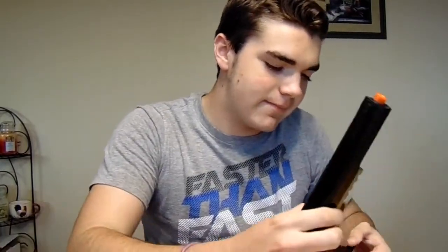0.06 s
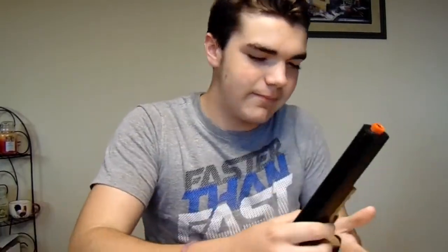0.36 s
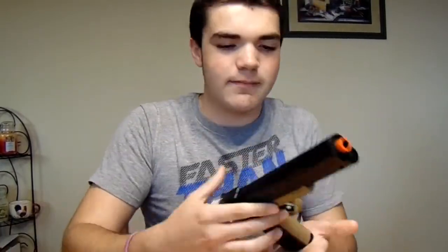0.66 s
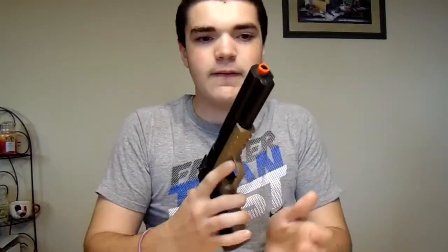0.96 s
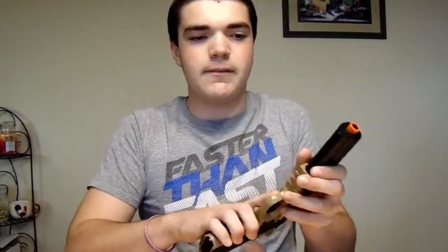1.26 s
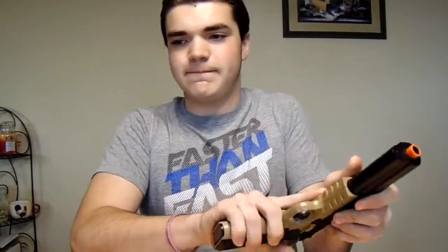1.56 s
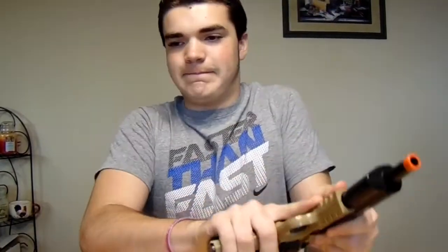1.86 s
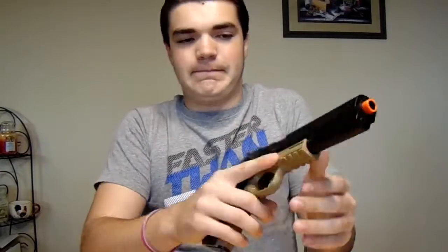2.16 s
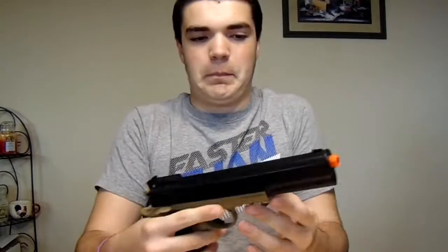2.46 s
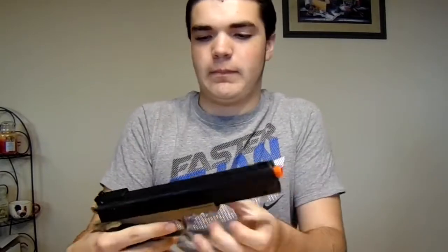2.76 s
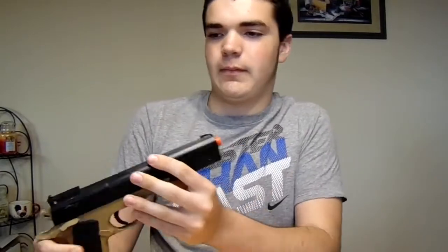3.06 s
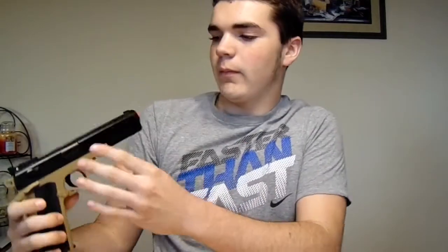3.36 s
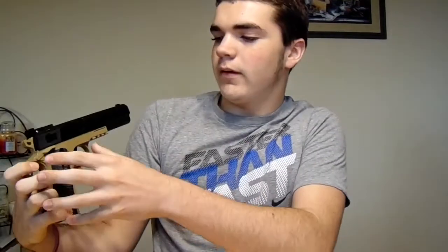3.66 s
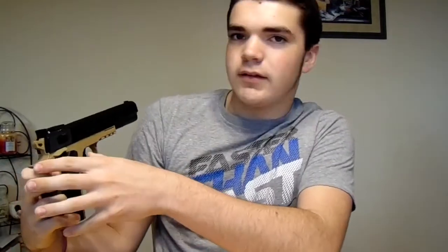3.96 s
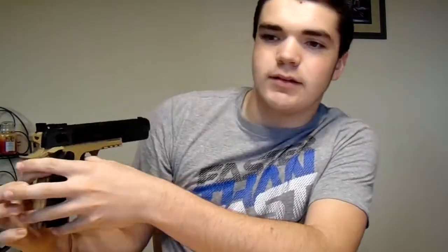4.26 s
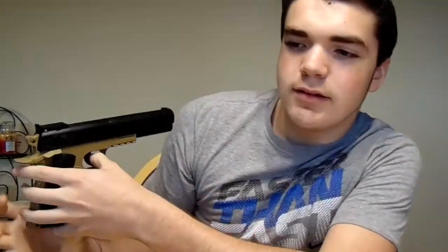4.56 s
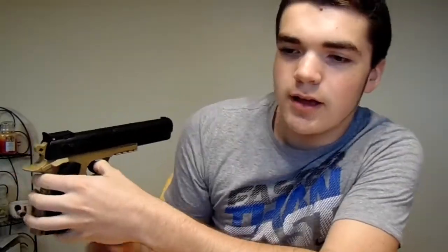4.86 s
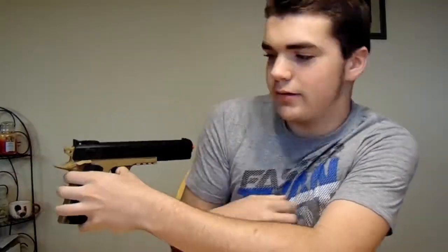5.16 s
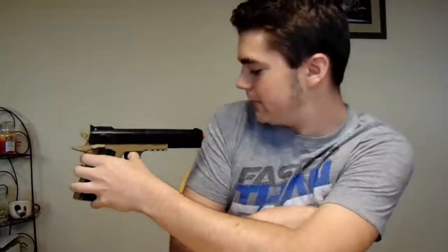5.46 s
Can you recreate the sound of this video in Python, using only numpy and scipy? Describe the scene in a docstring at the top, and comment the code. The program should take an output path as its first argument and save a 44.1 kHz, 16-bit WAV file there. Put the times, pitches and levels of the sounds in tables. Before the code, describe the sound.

A plastic toy pistol is handled close to a desk microphone in a bare room, over faint mains hum, fan noise and hiss. Fingers rub and a small squeak sounds at the start. At about 0.25 seconds the magazine scrapes into the grip, latching with a sharp click at 0.35. Loose parts tick irregularly amid faint, low seat creaks. Around 1.7 seconds the slide grinds back and hits its stop with a loud clack at 1.8, then scrapes forward and snaps home just after 2 seconds, leaving a faint spring ring. Sparser, softer ticks and tiny squeaks follow, the clearest tick near 3 seconds. A sleeve brushes softly at 4.3 seconds. At about 4.65 an elbow lands on the table with a dull thump and slight rattle, and the chair rumbles low under the leaning sitter, easing off by 5.5 seconds.

```python
"""A bare room, with a small desk microphone close to a plastic spring pistol being handled.
Loose parts tick amid small squeaks and low seat creaks; the magazine scrapes in and latches, the slide is
racked back and its scraping spring snaps it home. Each clack is a crack of noise, then the part's ringing.
Then a sleeve brushes, an elbow thumps on the table and the chair rumbles as its sitter leans over.
Mains hum, a faint fan and microphone hiss lie beneath."""
import sys
import numpy as np
from scipy import signal
from scipy.fft import rfft, irfft, next_fast_len
from scipy.io import wavfile
from scipy.ndimage import uniform_filter1d

SR = 44100
rng = np.random.default_rng(int(sys.argv[2]) if len(sys.argv) > 2 else 0)


def write(x):
    x = np.atleast_2d(x).T
    wavfile.write(sys.argv[1], SR, np.round(np.clip(x, -1, 1) * 32767).astype(np.int16))


N = 242638


def amp(db):
    """Decibels to gain."""
    return 10 ** (np.asarray(db) / 20)


def unit(x):
    """Scale to rms 1."""
    return x / np.sqrt(np.mean(x ** 2) + 1e-20)


def crest(x):
    """Scale so that the loudest 4 ms have rms 1."""
    return x / np.sqrt(uniform_filter1d(x ** 2, 176).max() + 1e-20)


def along(points, hz):
    """Read (frequency, value) points on a log frequency axis."""
    freqs, values = np.transpose(points)
    return np.interp(np.log(hz + 1), np.log(freqs + 1), values)


def filtered(x, response):
    """Multiply the spectrum of x by a function of frequency."""
    size = next_fast_len(len(x) + 8192)
    return irfft(rfft(x, size) * response(np.fft.rfftfreq(size, 1 / SR)), size)[:len(x)]


def coloured(x, colour, size=4096):
    """Minimum-phase filter through (frequency, level) points."""
    gain = amp(along(colour, np.fft.rfftfreq(size, 1 / SR)))
    cepstrum = irfft(np.log(gain + 1e-6))
    cepstrum[1:size // 2] *= 2
    cepstrum[size // 2 + 1:] = 0
    return signal.fftconvolve(x, irfft(np.exp(rfft(cepstrum))))[:len(x)]


def band(x, edge_hz, kind):
    """Causal low-, band- or high-pass."""
    return signal.sosfilt(signal.butter(3, edge_hz, kind, fs=SR, output="sos"), x)


def add(track, s, x):
    """Mix x into the track at time s."""
    start = int(np.clip(round(s * SR), 0, N - 1))
    track[start:start + len(x)] += x[:N - start]


def swells(rows, attack_s, release_db_per_s):
    """Gain of movements (time, hold, level) that each build up, hold and die away."""
    t = np.arange(N) / SR
    gain = np.zeros(N)
    for s, hold, db in rows:
        rise = np.clip((t - s) / attack_s, 0, 1)
        released_s = np.maximum(t - s - attack_s - hold, 0)
        gain += rise * amp(db - release_db_per_s * released_s)
    return gain


def friction(colour, slips_per_s, spread_db, hiss):
    """Tiny slips of uneven size over a smooth hiss."""
    slips = (rng.random(N) < slips_per_s / SR) * rng.choice([-1, 1], N)
    sizes = amp(spread_db * np.clip(rng.standard_normal(N), -2, 2))
    return unit(coloured(unit(slips * sizes) + hiss * rng.standard_normal(N), colour))


def stroke(rub, rows, split_hz, **envelope):
    """Pressure sets the body of a rubbing sound and speed its hiss."""
    body = swells([(s, hold, db) for s, hold, db, _ in rows], **envelope)
    hiss = swells([(s, hold, db) for s, hold, _, db in rows], **envelope)
    return body * unit(band(rub, split_hz, "low")) + hiss * unit(band(rub, split_hz, "high"))


def burst(t, t60, attack_s):
    """The dense, dying chatter of one contact."""
    return rng.standard_normal(len(t)) * amp(-60 * t / t60) * (1 - np.exp(-t / attack_s))


def ringing(t, modes, scatter_db=2):
    """Damped modes; each blow lands elsewhere and weights them anew."""
    ring = np.zeros(len(t))
    for hz, width, db in modes:
        weight = amp(db + scatter_db * rng.standard_normal()) * np.sqrt(width)
        ring += weight * np.exp(-np.pi * width * t) * np.sin(2 * np.pi * (hz * t + rng.random()))
    return crest(ring * (1 - np.exp(-t / 0.001)))


def contact(colour, modes, knock_db, snap_db, ring_db, t60, attack_s):
    """Plastic cracks and its modes ring on; a blunt blow knocks low, an edge snaps high."""
    t = np.arange(SR // 7) / SR
    first_touch = 1 + 0.96 * np.exp(-t / 0.0012)
    crack = crest(coloured(burst(t, t60, attack_s) * first_touch, colour))
    clack = crack + amp(ring_db) * ringing(t, modes)
    knock = amp(knock_db) * crest(band(clack, 1200, "low"))
    snap = amp(snap_db) * crest(band(clack, 5000, "high"))
    return knock + crest(band(clack, [1200, 5000], "band")) + snap


def strikes(hits, colour, modes, ring_db, lead_s):
    """A run of hard contacts on one part, each starting lead_s ahead of its time."""
    track = np.zeros(N)
    for s, db, knock_db, snap_db, t60 in hits:
        clack = contact(colour, modes, knock_db, snap_db, ring_db, t60, attack_s=0.0003)
        add(track, s - lead_s, amp(db) * clack)
    return track


# Mains hum: (frequency [Hz], relative level [dB])
HUM_PARTIALS = [(59.2, -62.5), (118.4, -67.5), (296.1, -70), (651.4, -77), (818.3, -74.5)]
# Fan and microphone hiss: (frequency [Hz], relative level [dB])
AIR_COLOUR = [(12, -33), (20, 4.5), (60, -4.5), (249, -4), (302, -4), (376, -8), (650, -14.5), (706, -25.5),
              (766, -7), (1010, -15.5), (1120, -12), (1220, -19), (14000, -29.5)]
def room_tone():
    """Mains hum, a faint fan and the microphone's own hiss."""
    t = np.arange(N) / SR
    hum = sum(amp(db) * np.sqrt(2) * np.sin(2 * np.pi * (hz * t + rng.random()))
              for hz, db in HUM_PARTIALS)
    air = unit(coloured(rng.standard_normal(N), AIR_COLOUR))
    return amp(-3.5) * hum + amp(-61) * air


# Finger strokes: (time [s], hold [s], body level [dB], hiss level [dB])
FINGER_STROKES = [(-.03, .05, -40.5, -46), (.6, .42, -53.5, -57.5), (1.33, 0.048, -49, -57),
                  (1.56, .06, -62, -60.5), (3.12, 1.6, -59.5, -60.5)]
# Skin on plastic: (frequency [Hz], relative level [dB])
SKIN_COLOUR = [(240, -41.5), (400, -6.5), (663, -17.5), (725, -5), (1120, -3.5), (1530, -9), (1800, -9.5),
               (2020, -11.5), (14000, -25.5)]
FINGER_ENVELOPE = dict(attack_s=0.03, release_db_per_s=40)
def fingers():
    """Fingers rub over the pistol's frame, close to the microphone."""
    rub = friction(SKIN_COLOUR, slips_per_s=690, spread_db=7, hiss=1.1)
    return stroke(rub, FINGER_STROKES, split_hz=2500, **FINGER_ENVELOPE)


# Seat creaks (near 300 Hz), the spring's scrape (1894 Hz) and handling squeaks:
# (time [s], length [s], pitch [Hz], half width [Hz], level [dB])
CREAKS_AND_SQUEAKS = [(0.041, 0.027, 1096, 133.9, -35), (0.469, 0.3, 295, 39.8, -55),
                      (1.938, 0.08, 1894, 160, -41.5), (3.252, 0.27, 301.4, 30, -56.5),
                      (3.504, 0.077, 2360, 118.8, -58.5)]
def creaks_and_squeaks():
    """Low seat creaks, the spring's scraping ring and small handling squeaks: narrow wavering notes."""
    track, t = np.zeros(N), np.arange(SR // 2) / SR
    for s, length, hz, half_width, db in CREAKS_AND_SQUEAKS:
        narrow_noise = band(rng.standard_normal(SR), [hz - half_width, hz + half_width], "band")
        note = unit(narrow_noise[SR // 2:])
        swell = np.sin(np.pi * np.clip(t / length, 0, 1) ** 0.5)
        add(track, s, amp(db) * swell * note)
    return track


def fidgets(per_s=6, pitch_hz=1600, snap_db=-5):
    """Rows of faint ticks at random moments, stronger when the fingers rub harder."""
    rubbing = swells([(s, hold, db) for s, hold, db, _ in FINGER_STROKES], **FINGER_ENVELOPE)
    rows = []
    for when, force, part in rng.random((int(per_s * N / SR), 3)):
        rubbing_db = 20 * np.log10(rubbing[int(when * N)] + 1e-9)
        rows.append((when * N / SR, rubbing_db + 1 + 9 * force, snap_db, pitch_hz * 2 ** (part - 0.5)))
    return rows


# Loose parts: (time [s], relative level [dB], relative snap [dB], pitch [Hz])
PART_TICKS = [(0.0442, -31.5, -27, 1110), (0.1062, -38, -22, 1900), (0.1884, -33.5, -4.5, 1120),
              (.5203, -28.5, -3, 2480), (0.7533, -28, -9.5, 720), (.8004, -25, -9.5, 1410),
              (.8344, -35, -1, 1540), (.8927, -31.5, -14.5, 2400), (1.096, -39, -18, 1400),
              (1.1807, -27.5, -5, 1330), (1.2201, -38, -4.5, 1580), (1.297, -23, -11, 1660),
              (1.3075, -24.5, -11.5, 1540), (1.3978, -18.5, -18, 1320), (1.501, -31, -11, 1660),
              (1.6646, -25.5, -20, 2280), (1.9378, -23, -4, 1880), (1.973, -34, -20, 1790),
              (2.4916, -39.5, -13.5, 1874), (2.6237, -50, -11, 1140), (2.6907, -44.5, -6, 1300),
              (2.982, -23.5, -12.5, 1040), (3.041, -33.5, -7, 1420), (3.182, -31.5, -9.5, 2280),
              (3.3018, -36.5, -15.5, 1400), (4.0316, -34, -6.5, 2030), (4.155, -42, -22, 1790),
              (4.4336, -36.5, -15, 1000)]
# The frame's crack under each tick: (frequency [Hz], relative level [dB])
FRAME_COLOUR = [(200, -36.5), (400, -16.5), (600, -3.5), (900, -7.5), (1400, -2.5), (2600, -3),
                (4300, -9.5), (7000, -15.5), (14000, -21)]
# The frame's ringing: (frequency [Hz], width [Hz], relative level [dB])
FRAME_MODES = [(823, 29, -6), (1050, 60, -4), (1320, 61, -4), (1802, 41, 0), (2860, 53, -7.5),
               (3000, 50, -6.5), (3900, 70, -8), (4910, 69, -10)]
def loose_parts():
    """Loose parts tick in the hands, each at its own pitch, and all die away alike."""
    track = np.zeros(N)
    for s, db, snap_db, hz in PART_TICKS + fidgets():
        knock_db = -2.5 - 8.5 * np.log2(hz / 1000)  # small, high-pitched parts knock less
        modes = [(hz, 60, 2)] + FRAME_MODES
        tick = contact(FRAME_COLOUR, modes, knock_db, snap_db + 5.5,
                       ring_db=-6, t60=0.036, attack_s=0.0004)
        add(track, s - 0.0005, amp(db - 4) * tick)
    return track


# The sitter's weight shifting: (time [s], hold [s], level [dB])
SEAT_SHIFTS = [(.06, 0.22, -53), (.5, 0.092, -61.5), (1.0, 1.015, -60), (3.1, 1.6, -60)]
# The seat's murmur: (frequency [Hz], relative level [dB])
SEAT_COLOUR = [(76, -36), (130, -6), (189, -12.5), (296, -5), (449, -14.5), (567, -15), (652, -10.5),
               (700, -10.5), (910, -36.5), (1540, -120)]
def seat():
    """The seat murmurs under shifting weight."""
    murmur = friction(SEAT_COLOUR, slips_per_s=140, spread_db=0.5, hiss=0.3)
    return swells(SEAT_SHIFTS, attack_s=0.097, release_db_per_s=60) * murmur


# The push up the grip: (time [s], hold [s], body level [dB], hiss level [dB])
MAGAZINE_PUSH = [(0.234, .012, -27, -28)]
# Magazine and latch contacts: (time [s], level [dB], knock [dB], snap [dB], t60 [s])
MAGAZINE_HITS = [(.236, -35, -4, -8.5, 0.024), (.2475, -18, -7, -9, 0.02), (.334, -21, -7.5, -0.5, 0.04),
                 (.338, -18.5, -14, -3.5, 0.032), (.3502, -9, -15.5, 8, 0.059),
                 (.3538, -9.5, -2, -8, 0.0083), (.3618, -23.5, -4.5, 13, 0.02)]
# The well's scrape and the grip's crack: (frequency [Hz], relative level [dB])
WELL_COLOUR = [(180, -42.5), (300, -12), (703, -17), (787, -5), (970, 2), (1300, -10), (1430, -3.5),
               (1600, -9), (1850, -4.5), (2170, -17), (2850, -10), (14000, -19.5)]
GRIP_COLOUR = [(100, -45), (400, -23), (600, -18.5), (850, -0.5), (1150, -17), (1750, -9), (2800, -6.5),
               (4500, -11), (7000, -9.5), (14000, -8.5)]
# The grip's ringing: (frequency [Hz], width [Hz], relative level [dB])
GRIP_MODES = [(903, 77, -12.5), (1657, 33, 1.5), (2490, 150, 2), (3570, 200, -4), (4626, 42, 7),
              (5220, 46, 2), (5890, 97, 3.5), (5600, 25, -5), (6350, 33, -0.5), (6750, 41, -5),
              (7580, 37, 0)]
def magazine():
    """Close to the microphone, the magazine scrapes up the grip and latches."""
    rub = friction(WELL_COLOUR, slips_per_s=1400, spread_db=2.5, hiss=0.2273)
    scrape = stroke(rub, MAGAZINE_PUSH, split_hz=2500, attack_s=0.014, release_db_per_s=95)
    return scrape + strikes(MAGAZINE_HITS, GRIP_COLOUR, GRIP_MODES, ring_db=-14.5, lead_s=0.00093)


# Jolts to the table: (time [s], level [dB])
TABLE_JOLTS = [(0.351, -54.5), (4.66, -46.5)]
def table_sway():
    """The table top sways after a jolt, a deep shudder at the desk microphone."""
    track, t = np.zeros(N), np.arange(SR * 2 // 3) / SR
    for s, db in TABLE_JOLTS:
        shudder = band(burst(t, t60=0.9, attack_s=0.02), [22, 48], "band")
        add(track, s, amp(db) * crest(shudder))
    return track


# Clacks that set the hollow body ringing: (time [s], level [dB])
SHELL_BLOWS = [(0.353, -33), (1.815, -36), (2.066, -46)]
# The hollow body: (frequency [Hz], width [Hz], relative level [dB])
SHELL_MODES = [(839, 7.9, 4.5), (933, 7, -5), (1460, 6.5, -6.5), (1793, 4.5, -1.5), (2338, 2.6, -1.5),
               (3496, 4.9, -0.5), (4160, 6, -5), (4536, 6.3, 3.5), (4880, 7, -2), (5900, 7, -3),
               (6460, 7, -2.5)]
def shell_ring():
    """The pistol's hollow body sings faintly after each clack."""
    track, t = np.zeros(N), np.arange(SR * 2 // 3) / SR
    for s, db in SHELL_BLOWS:
        add(track, s, amp(db) * ringing(t, SHELL_MODES))
    return track


# The slide's travel: (time [s], hold [s], body level [dB], hiss level [dB])
SLIDE_STROKES = [(1.66, 0.11, -42.5, -39.5), (1.748, 0.063, -30.5, -29.5), (1.925, 0.091, -37, -41.5),
                 (2.037, 0.0067, -32, -24.5)]
# Contacts at the rear and front stops: (time [s], level [dB], knock [dB], snap [dB], t60 [s])
REAR_HITS = [(1.7545, -23, -9.5, -4, .04), (1.786, -28.5, -14, 7, .02), (1.8108, -9, -20, 3.5, .015),
             (1.8142, -3.5, -25, -5, .022), (1.8218, -11, -17.5, 4.5, .022)]
FRONT_HITS = [(2.0445, -28.5, 1, -3.5, 0.076), (2.0595, -15.5, -14, 5, 0.046), (2.0615, -19, -9, -4, 0.04),
              (2.0652, -6.5, -8, 0, 0.02)]
# The rails' scrape and each stop's crack: (frequency [Hz], relative level [dB])
RAIL_COLOUR = [(180, -44.5), (300, -11.5), (580, -17), (826, -5), (1380, -9), (1820, -1), (2760, -12.5),
               (7240, -16.5), (14000, -23.5)]
REAR_COLOUR = [(88, -80), (150, -42), (1060, -14), (1260, -30), (1440, -7), (2490, -14.5), (4660, -3.5),
               (12000, -5.5), (14000, -10)]
FRONT_COLOUR = [(150, -34), (500, -25.5), (900, -18), (1750, -5), (2500, -6.5), (3300, -10), (4300, -12.5),
                (7000, -4), (14000, -13)]
# Each stop's ringing: (frequency [Hz], width [Hz], relative level [dB])
REAR_MODES = [(1519, 15, -7.5), (3570, 12, 7), (4650, 39, 5), (5670, 33, -13), (6040, 27, -14),
              (6300, 47, -9.5), (7400, 120, -9.5)]
FRONT_MODES = [(937, 75, -13), (1726, 30, -0.5), (2170, 45, -12.5), (3245, 26, 2), (5400, 70, -14.5),
               (6530, 160, -1)]
def slide():
    """At close range the slide grinds along its rails to the rear stop; the spring throws it home."""
    rub = friction(RAIL_COLOUR, slips_per_s=650, spread_db=6, hiss=0.95)
    scrape = stroke(rub, SLIDE_STROKES, split_hz=3500, attack_s=0.0092, release_db_per_s=200)
    back = strikes(REAR_HITS, REAR_COLOUR, REAR_MODES, ring_db=-21, lead_s=0.0007)
    home = strikes(FRONT_HITS, FRONT_COLOUR, FRONT_MODES, ring_db=-12, lead_s=0.00034)
    return scrape + back + home


# The steel spring: (frequency [Hz], width [Hz], relative level [dB])
SPRING_MODES = [(1745, 7, -3.5), (2820, 7, -4), (3237, 4.9, 6.5), (3370, 9, -1)]
def spring_ring(release_s=2.066, level_db=-34):
    """The steel spring rings on faintly after its release."""
    track, t = np.zeros(N), np.arange(SR * 2 // 3) / SR
    add(track, release_s, amp(level_db) * ringing(t, SPRING_MODES, scatter_db=3))
    return track


# The sleeve's movement: (time [s], hold [s], level [dB])
SLEEVE_BRUSH = [(4.305, 0.047, -48.5)]
# Cloth on cloth: (frequency [Hz], relative level [dB])
SLEEVE_COLOUR = [(590, -23), (1000, 1), (1190, -13), (1290, -9), (2640, 0), (14000, -9.5)]
def sleeve():
    """A sleeve brushes over the shirt."""
    cloth = friction(SLEEVE_COLOUR, slips_per_s=1400, spread_db=3, hiss=0.96)
    return swells(SLEEVE_BRUSH, attack_s=0.042, release_db_per_s=85) * cloth


# Blows on the table: (time [s], relative level [dB], rattle [dB])
ELBOW_BLOWS = [(4.634, -30, -9), (4.659, -23, -5), (4.67, -26, -12), (4.7, -30, -10)]
# The struck top: (frequency [Hz], relative level [dB])
TABLE_COLOUR = [(15, -40.5), (25, -3), (74, -18), (192, -4), (231, -3), (326, -3.5), (599, -6.5),
                (666, 0.5), (761, -17.5), (1330, -9.5), (1820, -16.5), (2440, -12), (2780, -22.5),
                (4990, -16.5), (14000, -32.5)]
# The top's ringing: (frequency [Hz], width [Hz], relative level [dB])
TABLE_MODES = [(132, 16, -10), (192, 24, 0), (321, 50, -13), (514, 34, -9.5), (720, 49, -16)]
def elbow():
    """An elbow lands on the table, which thuds, rings and lightly rattles."""
    track, t = np.zeros(N), np.arange(SR * 2 // 3) / SR
    for s, db, rattle_db in ELBOW_BLOWS:
        thud = band(coloured(burst(t, t60=0.076, attack_s=0.0049), TABLE_COLOUR), 1100, "low")
        rattle = band(coloured(burst(t, t60=0.13, attack_s=0.0014), TABLE_COLOUR), 1100, "high")
        blow = crest(thud) + ringing(t, TABLE_MODES) + amp(rattle_db) * crest(rattle)
        add(track, s - 0.002, amp(db - 8) * blow)
    return track


# The sitter leaning over: (time [s], hold [s], body level [dB], hiss level [dB])
CHAIR_LEAN = [(4.68, 0.43, -46, -48)]
# The chair's rumble: (frequency [Hz], relative level [dB])
CHAIR_COLOUR = [(15, -46), (25, -13), (82, -8.5), (173, -1), (208, 0), (372, -2.5), (616, -6.5),
                (802, -15.5), (1360, -22.5), (2140, -26), (2440, -23.5), (2780, -25), (14000, -38)]
# Its frame resounding: (time [s], hold [s], level [dB])
CHAIR_DRONE = [(4.785, 0.024, -37.5)]
# Its frame's resonances: (frequency [Hz], width [Hz], relative level [dB])
CHAIR_MODES = [(211.6, 8, 9.5), (263, 13, 1.5), (578, 17, -5), (1400, 18, -11), (1770, 25, -12.5),
               (2374, 49, -15.5)]
def chair():
    """The chair rumbles and drones in its own resonances as its sitter leans over."""
    def frame_response(f):
        return sum((-1) ** k * amp(db) * 1j * f * width / (hz * hz - f * f + 1j * f * width)
                   for k, (hz, width, db) in enumerate(CHAIR_MODES))
    rub = friction(CHAIR_COLOUR, slips_per_s=600, spread_db=0.5, hiss=1.0)
    rumble = stroke(rub, CHAIR_LEAN, split_hz=1130, attack_s=0.018, release_db_per_s=27.4)
    drone = unit(filtered(rng.standard_normal(N), frame_response))
    return rumble + swells(CHAIR_DRONE, attack_s=0.11, release_db_per_s=55) * drone


# The bare room's decay: (frequency [Hz], t60 [s])
ROOM_DECAY = [(150, 0.22), (600, 0.61), (1500, 0.53), (4000, 0.55), (8000, 0.44), (14000, 0.27)]
def room(x, early_db, tail_db, size=256):
    """Energy lingers in each band as diffuse noise: briefly between near walls, longer in the room."""
    frames = dict(fs=SR, nperseg=size, noverlap=size * 3 // 4)
    hz, _, direct = signal.stft(x, **frames)
    t = np.arange(direct.shape[1] // 6) * (size // 4) / SR

    def reflections(t60, db):
        power = amp(-60 * t / t60) ** 2 * (1 - np.exp(-t / 0.004))
        return amp(db) ** 2 * power / power.sum(axis=-1, keepdims=True)
    decay = reflections(0.074, early_db) + reflections(along(ROOM_DECAY, hz)[:, None], tail_db)
    energy = np.abs(signal.fftconvolve(np.abs(direct) ** 2, decay, axes=1))[:, :direct.shape[1]]
    noise = signal.stft(rng.standard_normal(N), **frames)[2]
    diffuse = noise * np.sqrt(energy / np.mean(np.abs(noise) ** 2))
    return x + signal.istft(diffuse, **frames)[1][:N]


def scene():
    """The mix at the one desk microphone; table levels are those before these gains."""
    handling = amp(-6.5) * room(fingers() + loose_parts() + sleeve(), early_db=-5, tail_db=-2)
    loading = amp(-3) * room(magazine(), early_db=-9, tail_db=-8)
    racking = amp(-5.5) * room(slide(), early_db=-6, tail_db=-8.5)
    table = amp(0.5) * room(table_sway() + elbow(), early_db=-4, tail_db=-1.5, size=1024)
    direct_only = room_tone() + creaks_and_squeaks() + seat() + shell_ring() + spring_ring() + chair()
    return (handling + loading + racking + table + direct_only)[None]


def record(dry, ceiling=0.85, top_hz=14220):
    """The loudest cracks flatten near full scale, and the treble ends steeply at the band limit."""
    clipped = dry[0] / (1 + np.abs(dry[0] / ceiling) ** 8) ** (1 / 8)
    return filtered(clipped, lambda hz: 1 / np.sqrt(1 + (hz / top_hz) ** 280))[None]


dry = scene()
out = record(dry)
write(out)
```